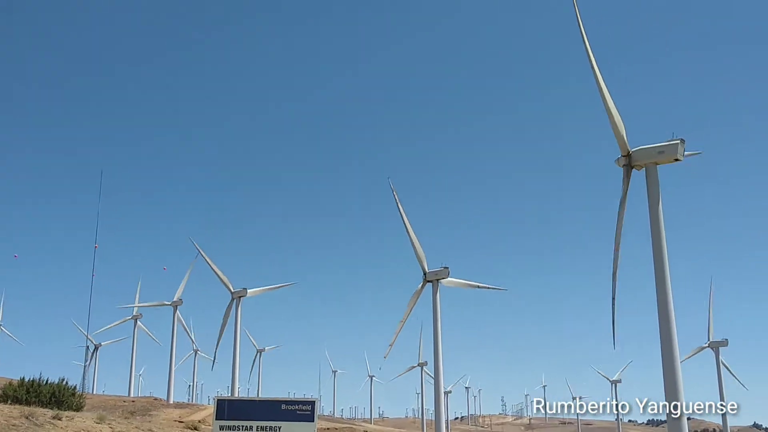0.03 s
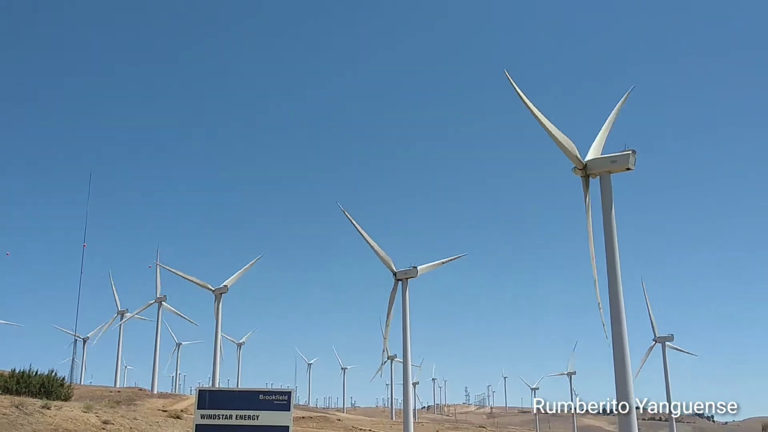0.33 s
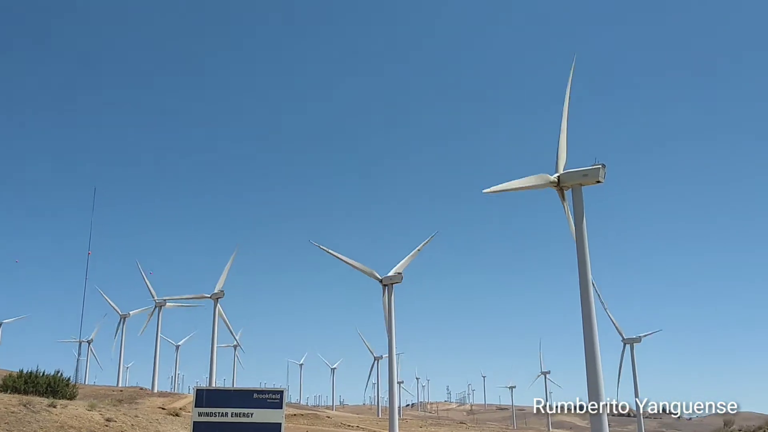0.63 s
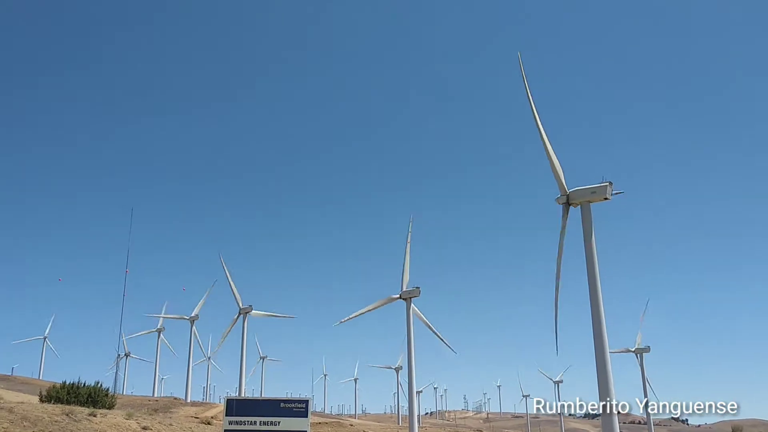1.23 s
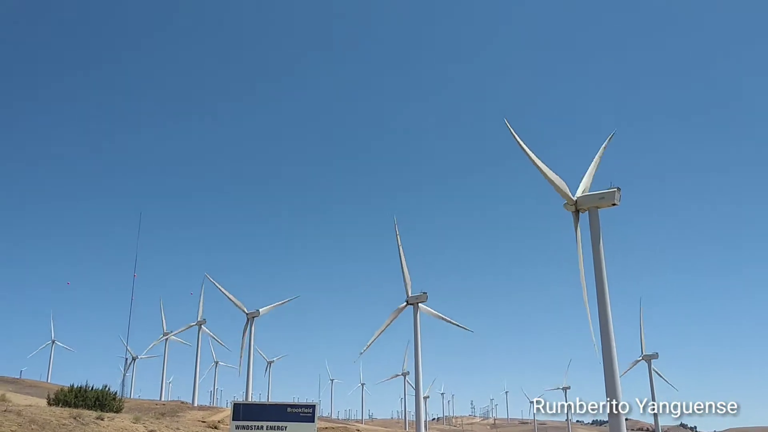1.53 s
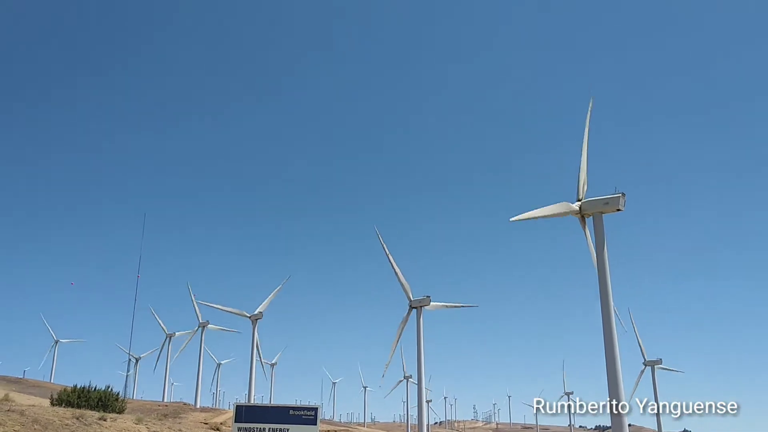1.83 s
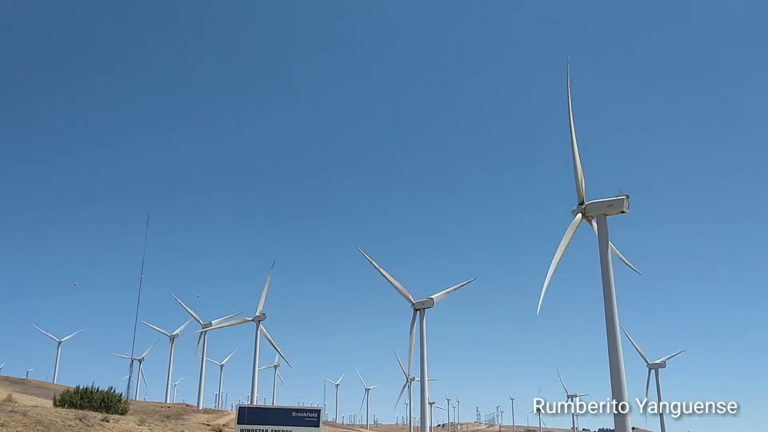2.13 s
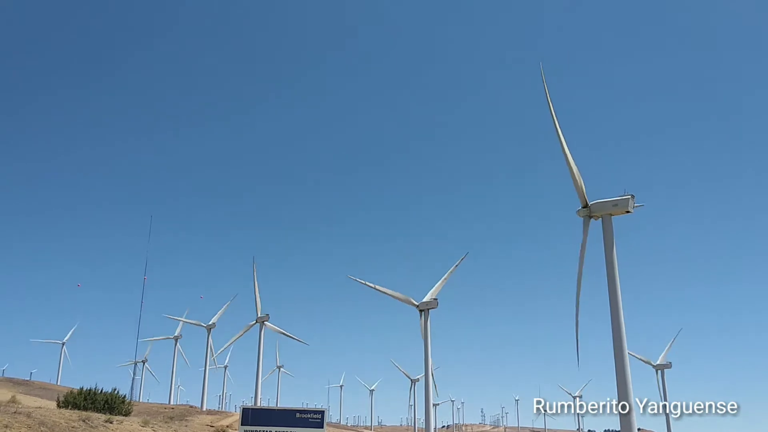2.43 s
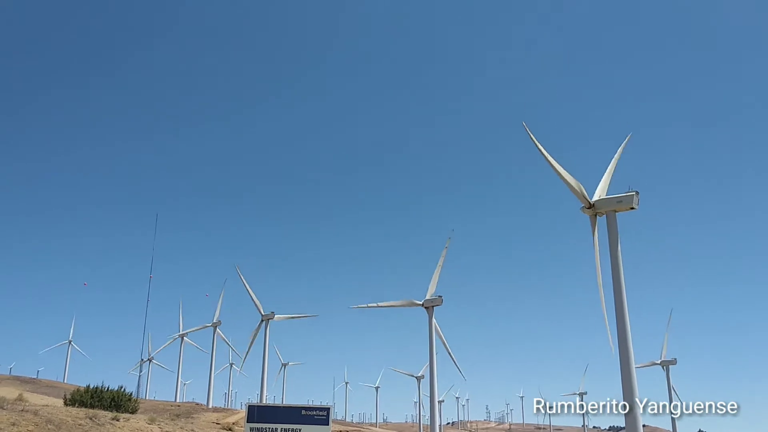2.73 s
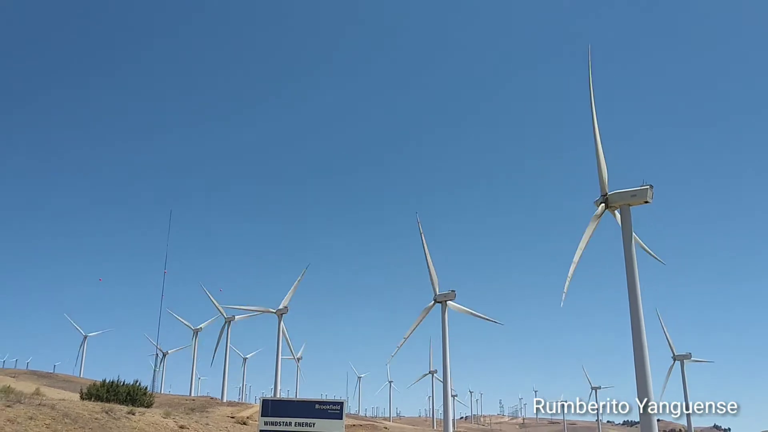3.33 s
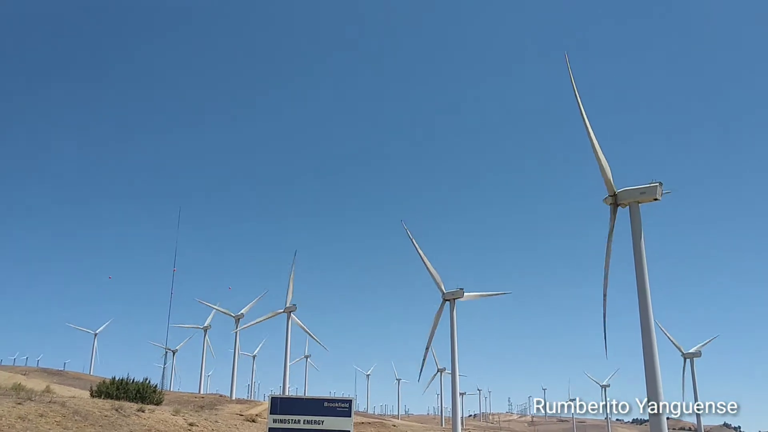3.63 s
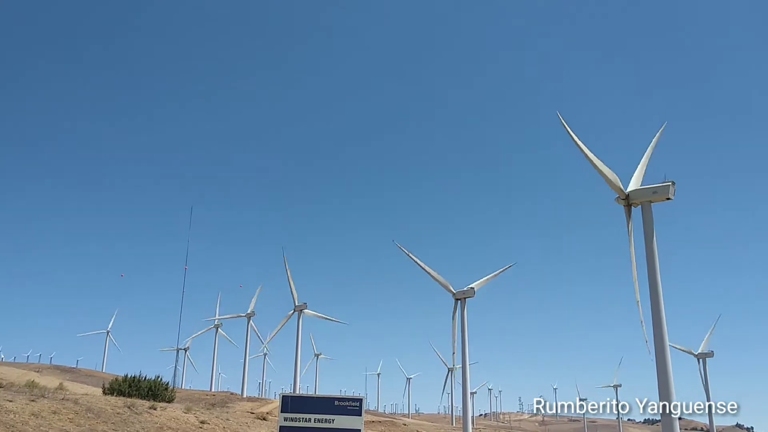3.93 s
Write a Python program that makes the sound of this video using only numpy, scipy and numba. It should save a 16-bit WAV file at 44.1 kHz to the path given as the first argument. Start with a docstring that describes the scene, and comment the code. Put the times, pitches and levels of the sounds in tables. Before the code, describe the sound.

Uneven wind buffets the microphone, gradually easing, with faint hiss and distant turbine whine.

```python
"""Gusty wind on a bare microphone in open, dry country, over faint hiss and a far turbine whine.
It starts strong: large eddies rumble at the port, vortices off the housing throb, single buffets thump.
Near 0.8 s a low boom swells and the flow turns rough: small eddies add a sputtering rush and a rasp.
From 1.5 s the wind eases and an airy band stands out in the hiss; the buffets go on.
After a lull near 3.3 s, short gusts return."""
import sys
import numpy as np
from scipy import signal
from scipy.fft import rfft, irfft
from scipy.io import wavfile
from scipy.ndimage import uniform_filter1d, minimum_filter1d
from numba import njit

SR = 44100
rng = np.random.default_rng(int(sys.argv[2]) if len(sys.argv) > 2 else 0)


def generate_wav(signal):
    """Clip the signal to [-1, 1] and save it as 16-bit WAV at the path in sys.argv[1]."""
    frames = np.transpose(np.atleast_2d(signal))
    scaled = np.clip(frames, -1, 1) * 32767
    pcm = np.round(scaled).astype(np.int16)
    wavfile.write(sys.argv[1], SR, pcm)


N = 176400

# far turbine tones: f/Hz, width/Hz, level/dB
TURBINE_BANDS = [(998, 78, -59.5), (1380, 37, -73.5), (1703, 150, -63), (4725, 320, -66.5)]
# steady hiss: f/Hz, relative density/dB
HISS_SPECTRUM = [(100, 13.5), (500, -1), (800, 9.5), (1200, 6.5), (1750, 3.5), (2200, 1), (2900, -0.5),
                 (3600, -6), (4300, -1), (4700, -4), (5250, -1.5), (5700, -10), (6700, -11), (7500, -10.5),
                 (8100, -8.5), (8550, 2.5), (9200, -5), (10200, -11), (11500, -18), (15500, -19)]
# airy band of the hiss: t/s, level/dB
AIR_LEVEL = [(0, -69), (1.1, -66.5), (1.3, -63), (1.55, -60), (1.8, -64), (2.4, -62), (4, -65)]
# slow pressure swells: f/Hz, relative density/dB
BOOM_SPECTRUM = [(20, -38), (36, -20.5), (50, -8), (70, 12), (100, 18.5), (150, -11), (300, -48.5),
                 (1000, -100)]
# strength of the swells: t/s, level/dB
BOOM_ENVELOPE = [(0, -46), (0.15, -42), (0.55, -41), (0.7, -30), (0.85, -31.5), (1.15, -41), (1.55, -46),
                 (1.8, -39), (2.0, -37), (2.3, -39), (2.8, -48.5), (3.1, -41), (3.33, -49), (3.6, -45),
                 (3.8, -65), (4.0, -48)]
# rough air streaming over the port: f/Hz, relative density/dB
RASP_SPECTRUM = [(300, -28), (900, 1.5), (1500, 4), (2300, -3.5), (3300, -11), (4700, -14), (6500, -22),
                 (8500, -13), (11000, -31.5), (16000, -45.5)]
# small eddies: f/Hz, relative density/dB
RUSH_SPECTRUM = [(30, -55), (70, -16.5), (200, -4), (400, 4.5), (650, 0.5), (1000, -9), (1500, -20),
                 (2200, -31), (3300, -42.5), (4700, -53), (8000, -79), (16000, -100)]
# large eddies: f/Hz, relative density/dB
RUMBLE_SPECTRUM = [(20, -82.5), (45, -47), (75, -31.5), (115, -7), (160, 0.5), (225, -2), (350, -1.5),
                   (500, -10), (750, -25), (1200, -46), (3000, -70), (8000, -108)]
# wind at the port: t/s, relative level/dB, rush share/dB
GUSTS = [(0, -14, -9), (0.1, -15, -18), (0.16, -20.5, -11), (0.25, -21, -13), (0.418, -20.5, -20.5),
         (0.5, -13.5, -18), (0.589, -18.5, -17), (0.72, -15, -13), (0.82, -16.5, -10.5), (0.91, -17.5, -7),
         (0.989, -23.5, -16), (1.07, -17.5, -12), (1.2, -18.5, -20.5), (1.36, -18.5, -11),
         (1.46, -17.5, -18), (1.51, -21, -17), (1.56, -31.5, -14), (1.645, -27.5, -17),
         (1.69, -23.5, -14.5), (1.75, -27.5, -22.5), (1.87, -25.5, -18.5), (1.97, -21, -19.5),
         (2.06, -27.5, -10.5), (2.14, -21.5, -9.5), (2.23, -29.5, -16), (2.26, -24.5, -5),
         (2.33, -26.5, -22.5), (2.47, -30.5, -20), (2.61, -24.5, -21.5), (2.7, -28.5, -34),
         (2.8, -28.5, -27), (2.95, -39.5, -16), (3.05, -34.5, -9), (3.21, -33.5, -31), (3.32, -47.5, -25),
         (3.365, -36, -22), (3.4, -24.5, -15), (3.53, -35, -26), (3.61, -24, -14), (3.68, -29, -21),
         (3.76, -37, -46), (3.871, -27.5, -17), (3.91, -34.5, -26), (4.0, -24.5, -15)]
# single eddies hitting the port: peak t/s, length/s, relative level/dB, rush share/dB, relative thud/dB
BUFFET_HITS = [(0.041, 0.0039, -6.5, -30.5, -2), (0.181, 0.0061, -8.5, -25, -44),
               (0.211, 0.021, -12, -30, -44), (0.261, 0.0073, -12.5, -35, -16),
               (0.299, 0.0046, -14, -27, -13), (0.696, 0.0093, -17.5, -10, -11),
               (0.795, 0.0062, -11.5, -17, -25), (0.884, 0.01, -15, -11, -20),
               (0.954, 0.0047, -11.5, -20, -32), (1.043, 0.007, -9.5, -26, -32),
               (1.083, 0.0075, -9.5, -16, -32), (1.249, 0.016, -15, -23.5, -48),
               (1.375, 0.022, -10.5, -27, -42), (1.489, 0.019, -23.5, -9, -43),
               (1.619, 0.019, -12.5, -19, -19), (1.664, 0.01, -11.5, -9, -20),
               (1.676, 0.0056, -11, -5, -10), (1.688, 0.021, -16, -13, -16), (1.724, 0.0039, -13, -31, -45),
               (1.909, 0.009, -16.5, -23.5, -33), (1.945, 0.0063, -22.5, -8.5, -35),
               (1.981, 0.015, -17.5, -14.5, -7.5), (2.025, 0.021, -20, -10, -18.5),
               (2.111, 0.0077, -19.5, -9.5, -42), (2.148, 0.0084, -29, -3, -14.5),
               (2.191, 0.008, -16, -32, -41), (2.371, 0.011, -16.5, -32, -41),
               (2.42, 0.033, -13.5, -23.5, -32), (2.499, 0.02, -19.5, -29, -30),
               (2.6, 0.019, -18.5, -42, -32), (2.777, 0.02, -14, -48, -43), (2.812, 0.021, -21.5, -43, -40),
               (2.852, 0.0082, -15.5, -20, -43), (2.906, 0.0044, -22.5, -21, -43),
               (3.014, 0.021, -22.5, -18.5, -24), (3.081, 0.015, -20, -19, -42),
               (3.101, 0.013, -18, -29, -42), (3.123, 0.0066, -11.5, -34, -27),
               (3.156, 0.0069, -25.5, -42, -40), (3.207, 0.018, -26.5, -31, -20),
               (3.403, 0.014, -27.5, -5, -33), (3.42, 0.014, -13.5, -39, -43),
               (3.472, 0.022, -21, -26.5, -28), (3.572, 0.0095, -16.5, -14, -41),
               (3.592, 0.014, -21, -19.5, -23), (3.621, 0.0071, -25, -18, -32),
               (3.662, 0.023, -19, -41, -57), (3.703, 0.016, -21, -18.5, -47)]


def undb(db):
    """Decibels to gain."""
    return 10 ** (np.asarray(db) / 20)


def noise(gain):
    """Noise of rms 1 with spectrum gain(f/Hz)."""
    f = np.maximum(np.arange(N // 2 + 1) * SR / N, 1)
    x = irfft(rfft(rng.standard_normal(N)) * gain(f), N)
    return x / x.std()


def coloured(spectrum):
    """Noise of rms 1 shaped by a spectrum table."""
    hz, db = np.array(spectrum).T
    return noise(lambda f: undb(np.interp(np.log(f), np.log(hz), db)))


def band(hz, width_hz):
    """Noise of rms 1 in one smooth band."""
    return noise(lambda f: np.exp(-2 * ((f - hz) / width_hz) ** 2))


def walk(hz):
    """Random wander of rms 1, rolling off above hz."""
    return noise(lambda f: np.exp(-.5 * (f / hz) ** 2))


def even(x, window_s=.012):
    """Holds short-term rms near 1; quick flutter stays."""
    size = int(window_s * SR)
    power = uniform_filter1d(uniform_filter1d(x ** 2, size), size)
    return x / np.sqrt(np.abs(power) + 1e-12)


def turbines():
    """Blurred gear tones of far wind turbines."""
    return sum(undb(db) * band(hz, width_hz) for hz, width_hz, db in TURBINE_BANDS)


def hiss(t, level_db=-50):
    """Steady hiss with an airy edge that rises and lingers."""
    air_db = np.interp(t, *np.array(AIR_LEVEL).T)
    return undb(level_db) * coloured(HISS_SPECTRUM) + undb(air_db) * band(hz=8140, width_hz=1000)


def rasp(rough_db, sputter, growth=1.437, offset_db=-5.5, ceiling_db=-38.5):
    """Rough air streaming over the port; grows faster than the rush, up to a ceiling."""
    level_db = np.minimum(offset_db + growth * rough_db, ceiling_db)
    return undb(level_db) * even(coloured(RASP_SPECTRUM) * sputter)


def shedding(centre_hz=236.1, width_hz=27.7, wander_oct=.2, wander_hz=9):
    """Vortices shed at the housing edge: a narrow, wandering throb."""
    hz = centre_hz * 2 ** (wander_oct * walk(wander_hz))
    phase = 2 * np.pi * np.cumsum(hz) / SR
    return even(walk(width_hz) * np.cos(phase) + walk(width_hz) * np.sin(phase))


def large_eddies(power, rush_power, flutter_gain, shed_db=3, breakup_db=-14):
    """Rumble at the port; its shed vortices break up as the rush-to-rumble ratio passes breakup_db."""
    smoothness = 1 / np.sqrt(1 + rush_power / (power * undb(breakup_db) ** 2))
    eddies = coloured(RUMBLE_SPECTRUM) + undb(shed_db) * smoothness * shedding()
    return np.sqrt(power) * even(eddies * flutter_gain)


def small_eddies(power, sputter):
    """Sputtering rush of rough flow."""
    return np.sqrt(power) * even(coloured(RUSH_SPECTRUM) * sputter)


def buffets(t, boom_trim_db=-10, rumble_trim_db=-.5, rush_trim_db=10):
    """Single eddies hit the port: pulses of boom, rumble and rush power."""
    boom, rumble, rush = np.zeros((3, N))
    for peak_s, length_s, level_db, share_db, thud_db in BUFFET_HITS:
        width_s = length_s * np.where(t < peak_s, .64, .7)  # rise, fall
        bell = np.exp(-((t - peak_s) / width_s) ** 2)
        boom += (bell * undb(thud_db + boom_trim_db)) ** 2
        rumble += (bell * undb(level_db + rumble_trim_db)) ** 2
        rush += (bell * undb(level_db + share_db + rush_trim_db)) ** 2
    return boom, rumble, rush


def wind(t, rumble_trim_db=-.5, rush_trim_db=5.5, max_share_db=-7.5):
    """Gusts and buffets add in power; rumble, rush and rasp flutter together over a softer boom."""
    times_s, levels_db, shares_db = np.array(GUSTS).T
    gust_db = np.interp(t, times_s, levels_db)
    rough_db = gust_db + np.interp(t, times_s, np.minimum(shares_db, max_share_db))
    boom_db = np.interp(t, *np.array(BOOM_ENVELOPE).T)
    sway_db = 1.8 * walk(hz=34.8)
    boom_hits, rumble_hits, rush_hits = buffets(t)
    boom_power = undb(boom_db) ** 2 + boom_hits
    rumble_power = undb(gust_db + sway_db + rumble_trim_db) ** 2 + rumble_hits
    rush_power = undb(rough_db + sway_db + rush_trim_db) ** 2 + rush_hits
    flutter_db = walk(hz=151)
    sputter = undb(4 * flutter_db)  # deeper flutter for rush and rasp
    boom = np.sqrt(boom_power) * coloured(BOOM_SPECTRUM)
    rumble = large_eddies(rumble_power, rush_power, undb(flutter_db))
    return boom + rumble + small_eddies(rush_power, sputter) + rasp(rough_db, sputter)


def scene():
    """Wind on the microphone over quiet country; mono."""
    t = np.arange(N) / SR
    return (wind(t) + hiss(t) + turbines())[None]


@njit
def peak_hold(magnitude, decay):
    """Peak follower: instant attack, exponential release."""
    out, held = np.empty(len(magnitude)), 0.
    for i in range(len(magnitude)):
        held = max(magnitude[i], held * decay)
        out[i] = held
    return out


def record(dry, low_hz=42, top_hz=15500, limit_db=-3.8, ratio=8, release_s=.22):
    """Recorder: bass cut, limiter ducking under the hardest buffets, top cut."""
    highpass = signal.butter(6, low_hz, "highpass", fs=SR, output="sos")
    lowpass = signal.ellip(10, .1, 80, top_hz, fs=SR, output="sos")
    x = signal.sosfilt(highpass, dry[0])
    peaks = peak_hold(np.abs(x), np.exp(-1 / (release_s * SR)))
    gain = np.minimum(1, undb(limit_db) / (peaks + 1e-9)) ** (1 - 1 / ratio)
    gain = uniform_filter1d(minimum_filter1d(gain, size=64), size=64)  # smooth look-ahead
    return signal.sosfilt(lowpass, x * gain)[None]


dry = scene()
out = record(dry)
generate_wav(out)
```